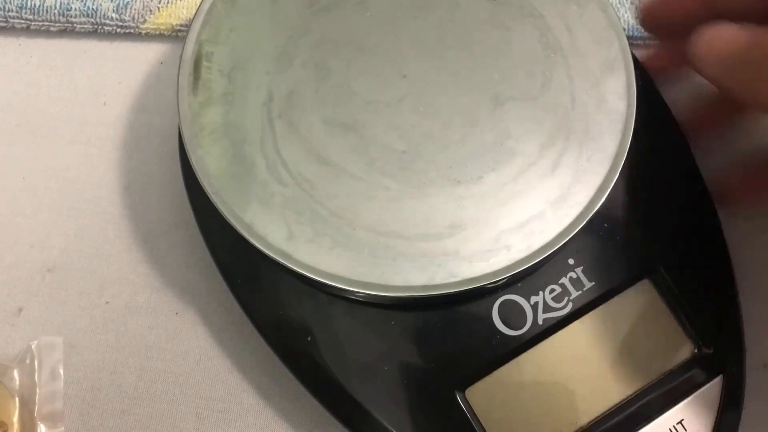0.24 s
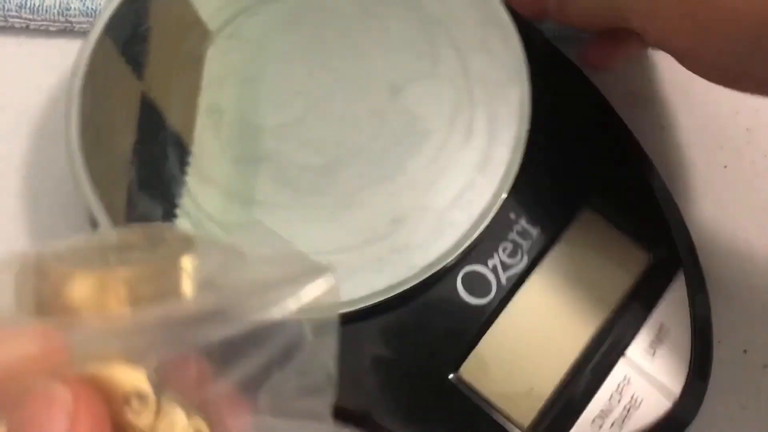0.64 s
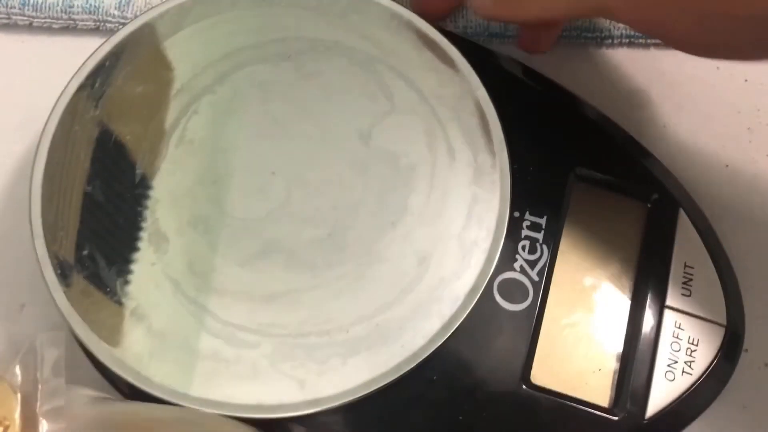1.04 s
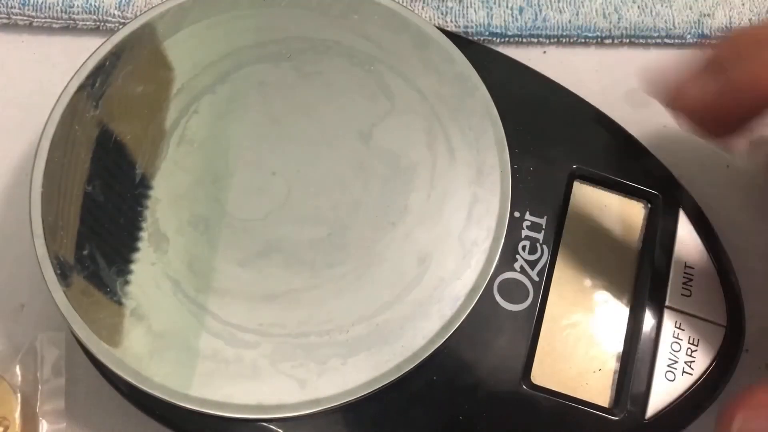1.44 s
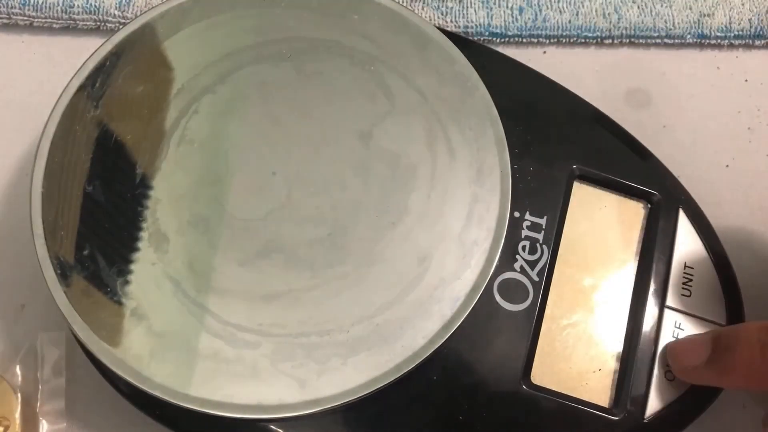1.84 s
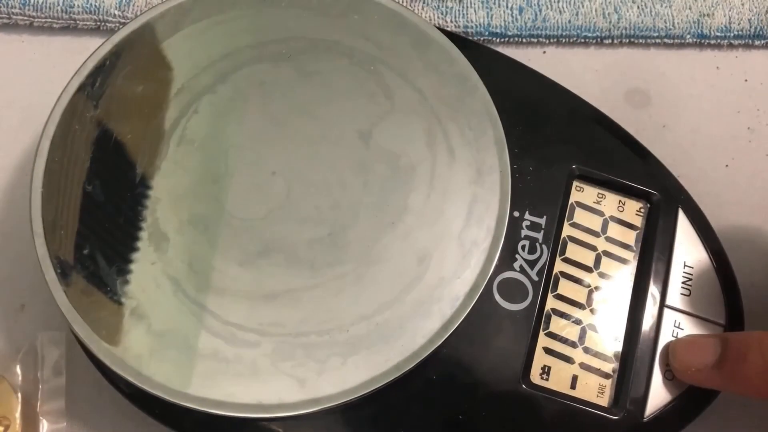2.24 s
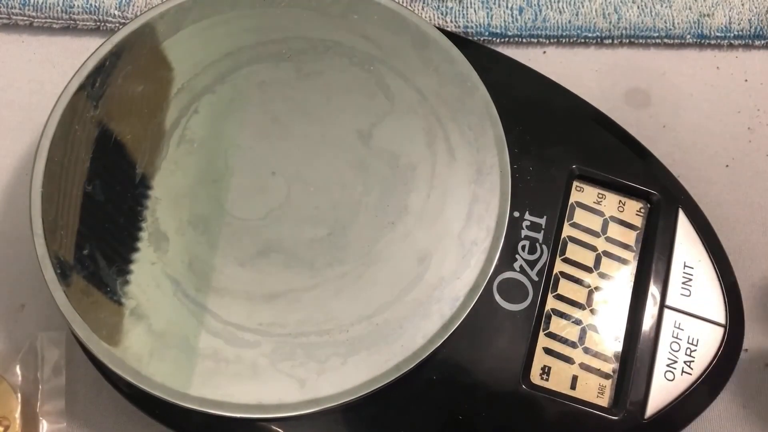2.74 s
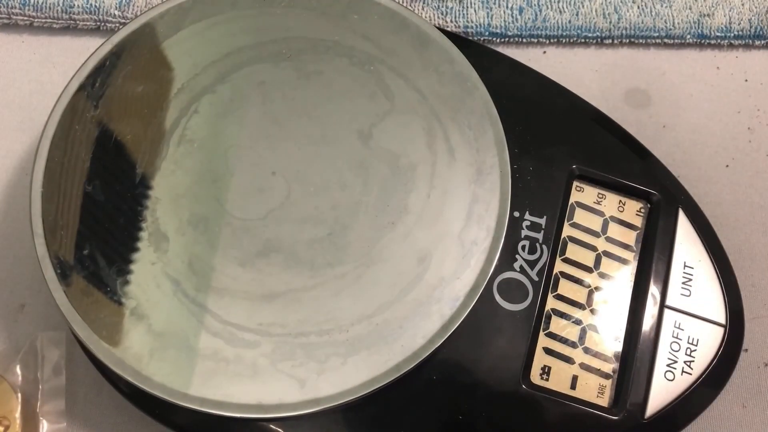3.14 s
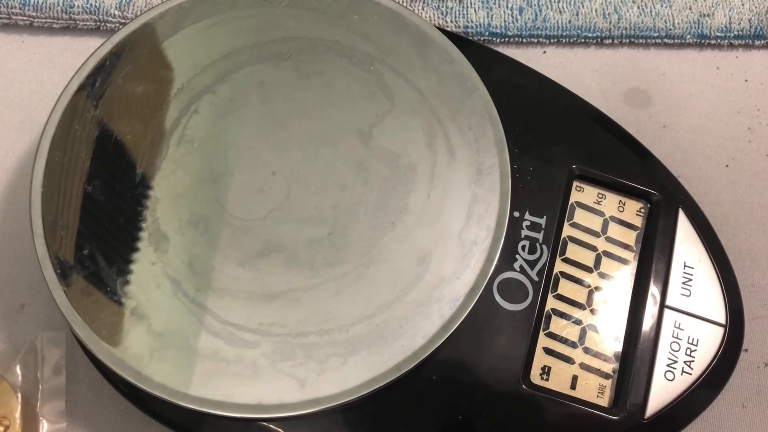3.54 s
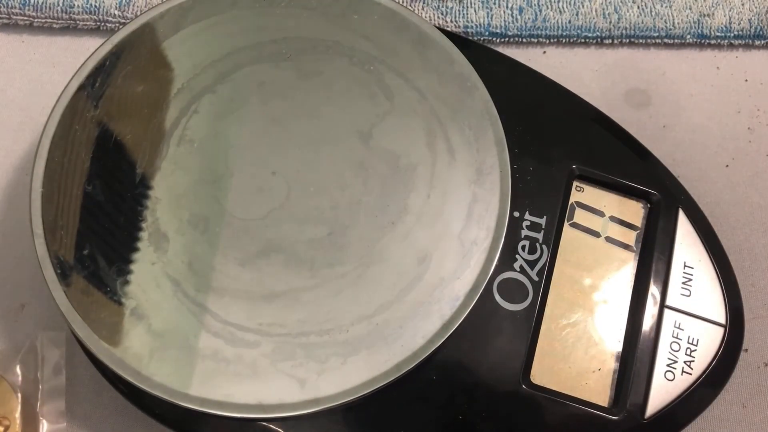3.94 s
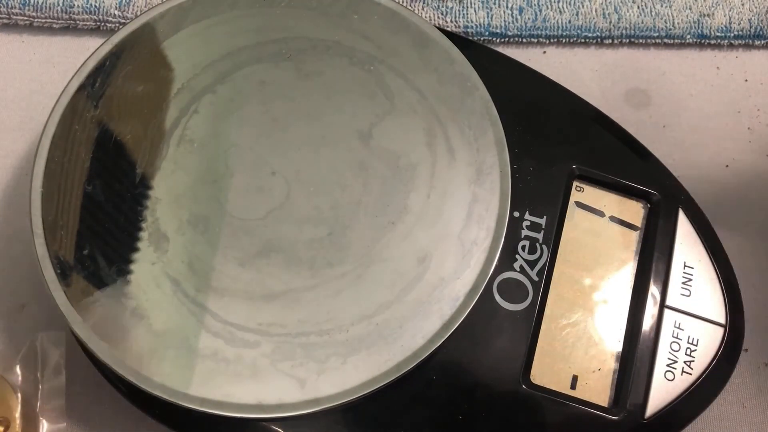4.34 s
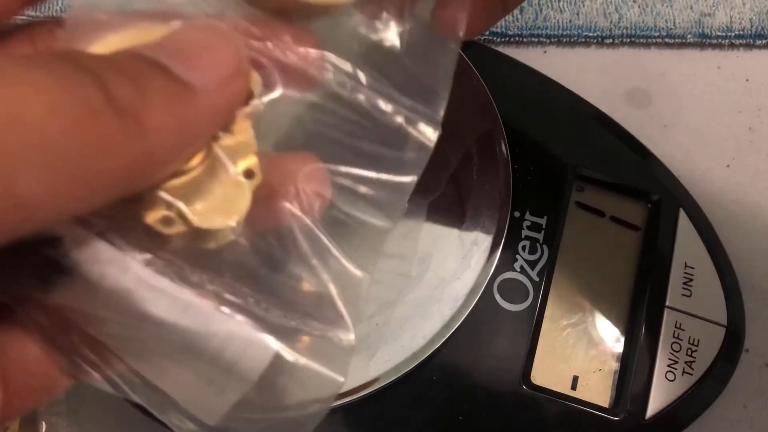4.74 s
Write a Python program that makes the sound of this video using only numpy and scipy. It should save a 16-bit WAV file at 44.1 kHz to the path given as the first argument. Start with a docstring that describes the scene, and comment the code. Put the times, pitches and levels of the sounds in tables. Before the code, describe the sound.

A steady low hum near 120 Hz, with a slightly wavering drone and soft dull room noise, runs throughout. From 0 to 0.8 s plastic bags rustle close by: a strong rub at the start, a sharp crease snap at 0.07, more crackles until 0.7, and soft low bumps at about 0.2, 0.3 and 0.8 as a scale shifts on its feet. From 0.9 to 1.8 s it is nearly quiet, with faint taps and light skin brushes. At 1.84 s the scale's button snaps down, bright, hard and plasticky with a small thud; at 1.99 it releases, duller and slightly softer. A short room tail follows. Between 2.1 and 4.2 s come sparse, quiet finger taps and thin hisses, a duller knock at 3.14, and a crisp bright tick at 3.98. From 4.5 s to the end at 5 s, bags holding metal parts are lifted with dense crinkling, snaps and dull touches.

```python
"""Kitchen scale, button and bagged parts

A scale is turned on a bench, its button clicks down and up, and brass parts in plastic bags are picked up.
Shaped noise and random slips make the rustle and the slides of skin; dispersed pulses make snaps and taps.
The button is a contact pulse ringing case modes, with a thud; decaying low sines are the feet bumping.
A steady tone, a wavering drone and soft noise hum throughout; decaying noise is the small room's tail."""
import sys
import numpy as np
from scipy import signal
from scipy.fft import rfft, irfft
from scipy.io import wavfile
from scipy.ndimage import uniform_filter1d

SR = 44100
rng = np.random.default_rng(int(sys.argv[2]) if len(sys.argv) > 2 else 0)


def unload_audio(sound):
    """Save the sound as a 16-bit wav file, at the path given as the first command line argument."""
    columns = np.transpose(np.atleast_2d(sound))
    # keep every value between -1 and 1, then stretch to whole-number steps
    steps = np.round(np.clip(columns, -1, 1) * 32767)
    wavfile.write(sys.argv[1], SR, steps.astype(np.int16))


N = 220573
TIME, BINS = np.arange(N) / SR, np.fft.rfftfreq(N, 1 / SR)
HIT_TIME = np.arange(4096) / SR
HIT_BINS = np.fft.rfftfreq(len(HIT_TIME), 1 / SR) + 1  # 1 Hz up, so that no bin is zero


def amp(db):
    """Decibels to gain."""
    return 10 ** (np.asarray(db) / 20)


def unit(x):
    """Scales to rms 1."""
    return x / np.sqrt(np.mean(x ** 2) + 1e-20)


def read(points, hz):
    """Reads a table on a log-frequency axis."""
    f, value = np.transpose(points)
    return np.interp(np.log(hz + 1), np.log(f + 1), value)


def add(mix, start_s, sound):
    """Mixes a sound in at start_s."""
    part = mix[max(round(start_s * SR), 0):][:len(sound)]
    part += sound[:len(part)]


def colour(x, gain):
    """Filters a full-length signal by a gain per bin, to rms 1."""
    return unit(irfft(rfft(x) * gain, N))


def drift(rate_hz):
    """Random drift of rms 1, low-passed near rate_hz."""
    return colour(rng.standard_normal(N), np.exp(-(BINS / rate_hz) ** 2))


def pulse(gain):
    """The sharpest causal (minimum-phase) pulse with this spectrum, by folding the cepstrum."""
    cepstrum = irfft(np.log(np.maximum(gain, 1e-5)))
    half = len(cepstrum) // 2
    cepstrum[1:half] *= 2
    cepstrum[half + 1:] = 0
    return irfft(np.exp(rfft(cepstrum)))


def scatter(t60_s, slope):
    """Crowded modes as octave bands of decaying noise, the high ones dying sooner; equal energy per Hz."""
    out, octave = 0, np.log2(HIT_BINS / 125)
    for k in range(8):
        band = np.cos(np.pi / 2 * np.clip(octave - k, -1, 1))
        band_t60_s = t60_s * 2 ** (-slope * (k - 3))  # t60_s holds at 1 kHz
        noise = irfft(rfft(rng.standard_normal(len(HIT_TIME))) * band)
        ring = noise * np.exp(-np.log(1000) * HIT_TIME / band_t60_s)
        out = out + ring / np.linalg.norm(ring) * np.sqrt(np.mean(band ** 2))
    return out


def hum():
    """Steady mains hum and a wavering drone (narrow-band noise) over soft room noise."""
    # room noise spectrum: (frequency [Hz], relative level [dB per Hz])
    floor_colour = [(15, -59), (25, -21), (87, -16), (102, -7.5), (123, -7), (157, -7), (190, -10.5),
                    (293, -19), (326, -23.5), (427, -25.5), (476, -27), (516, -26), (1040, -37.5),
                    (4030, -48), (16000, -55)]
    # drone: (frequency [Hz], level [dB], width [Hz])
    drone = [(136.7, -53.5, 13), (189, -57, 23)]
    floor_db, mains_hz, mains_db = -52.5, 119.1, -52
    out = amp(floor_db) * colour(rng.standard_normal(N), amp(read(floor_colour, BINS)))
    out += amp(mains_db) * unit(np.sin(2 * np.pi * mains_hz * TIME))
    for hz, db, width_hz in drone:
        resonance = 1 / (1 + (2 * (BINS - hz) / width_hz) ** 2)
        out += amp(db) * colour(rng.standard_normal(N), resonance)
    return out


def shifting(x, patchy_db):
    """The film flexes, so its resonances come and go in patches of time and frequency."""
    z = signal.stft(x, SR, nperseg=256)[2]
    patches = uniform_filter1d(rng.standard_normal(z.shape), size=4, axis=0)
    patches = unit(uniform_filter1d(patches, size=6, axis=1))
    return signal.istft(z * amp(patchy_db * patches), SR, nperseg=256)[1][:N]


def stroke_level(start_s, length_s, release_s):
    """One stroke of rubbing: a quick grip, a slow swell as it presses harder, a short release."""
    grip_s, swell_db_per_s = 0.0041, 13.5
    t = np.maximum(TIME - start_s, 0)
    held = np.minimum(t / grip_s, 1) * amp(swell_db_per_s * np.minimum(t, length_s))
    return held * np.exp(-np.clip((t - length_s) / release_s, 0, 20))


def rubbing():
    """Tiny slips of plastic merge into a rustle, duller or brighter from stroke to stroke."""
    # strokes, scale turned and bags lifted: (start [s], length [s], relative body level [dB], fizz above body [dB])
    rubs = [(0.0, 0.11, -49.5, -1), (0.052, 0.015, -55, 11), (0.12, 0.12, -63.5, 2.5),
            (0.176, 0.54, -58.5, -1), (0.736, 0.068, -55.5, -8.5), (0.982, 0.038, -71, 6),
            (1.096, 0.17, -71.5, 3.5), (4.506, 0.049, -56, 5), (4.599, 0.028, -52, 3.5),
            (4.633, 0.06, -55.5, 2), (4.698, 0.057, -50.5, 0.5), (4.756, 0.07, -57, 4),
            (4.85, 0.15, -68, -1), (4.965, 0.037, -61, 4)]
    # rustle spectrum: (frequency [Hz], relative level [dB per Hz])
    rub_colour = [(120, -2), (250, 7), (500, 0), (1200, 1.5), (2200, -4), (4000, -2.5), (5500, -6),
                  (7200, -8), (9000, -11), (12000, -12), (16000, -15.5)]
    slips_per_s, slip_db, smooth = 1500, 2.0, 0.53  # smooth: share of plain noise
    split_hz, trim_db = 2700, -1
    body_release_s, fizz_release_s = 0.021, 0.012  # the fizz stops sooner than the body
    slip_size = amp(slip_db * np.minimum(rng.exponential(1, N), 4))
    slips = (rng.random(N) < slips_per_s / SR) * rng.choice([-1, 1], N) * slip_size
    drive = shifting(unit(slips) + smooth * rng.standard_normal(N), patchy_db=1.66)
    drive = drive * amp(1.0 * drift(91))  # flutter of 1 dB rms
    shape, low = amp(read(rub_colour, BINS)), 1 / (1 + (BINS / split_hz) ** 4)
    body_power, fizz_power = np.zeros((2, N))
    for start_s, length_s, db, fizz_db in rubs:
        body_power += (amp(db) * stroke_level(start_s, length_s, body_release_s)) ** 2
        fizz_power += (amp(db + fizz_db) * stroke_level(start_s, length_s, fizz_release_s)) ** 2
    body = colour(drive, shape * low) * np.sqrt(body_power)
    fizz = colour(drive, shape * (1 - low)) * np.sqrt(fizz_power)
    return amp(trim_db) * (body + fizz)


def clicks(rows, t60_s, crowd_db, skirt_db, gain_db, bass_hz, lag_s):
    """A sharp push with a broad resonance, then milliseconds of crowded modes: (direct, into the room)."""
    direct, spread = np.zeros(N), np.zeros(N)
    # bending waves in a thin sheet carry the treble first; lag_s is the delay at 1 kHz
    bending = np.exp(-4j * np.pi * lag_s * np.sqrt(1000 * HIT_BINS))
    for start_s, db, hz, width_oct, treble_hz in rows:
        offset = np.log2(HIT_BINS / hz) / max(width_oct, .2)  # in resonance widths
        resonance = amp(-skirt_db * (np.sqrt(1 + offset ** 2) + 3.0))
        edges = (1 + (bass_hz / HIT_BINS) ** 2) * np.sqrt(1 + (HIT_BINS / treble_hz) ** 6)
        push = irfft(rfft(pulse(resonance / edges)) * bending)
        modes = signal.fftconvolve(push, scatter(t60_s, 0.43))[:len(push)]
        click = push + amp(crowd_db) * modes
        size = amp(db + gain_db) * np.sqrt(.005 * SR)  # table levels are rms over 5 ms
        add(direct, start_s - lag_s / 2, size * click / np.linalg.norm(click))
        add(spread, start_s, size * push / np.linalg.norm(push))
    return np.array([direct, spread])


def creases():
    """Creases snap in the plastic, each a dispersed push of fixed width: (direct, into the room)."""
    # (time [s], relative level over 5 ms [dB], centre [Hz], treble corner [Hz])
    snap_table = [(0.065, -23, 1910, 18000), (0.2277, -33, 750, 18100), (0.3196, -26, 5500, 7800),
                  (0.38, -41.5, 7000, 12000), (0.4863, -44.5, 1600, 4170), (0.628, -37, 9900, 2560),
                  (0.7147, -29.5, 635, 5100), (4.515, -36, 895, 9800), (4.521, -37, 1600, 8900),
                  (4.5528, -30.5, 3300, 5250), (4.6586, -28.5, 2600, 3620), (4.7087, -28, 3800, 4500),
                  (4.7167, -42, 4000, 5200), (4.7378, -26, 1970, 16000), (4.7687, -33, 1310, 7600),
                  (4.789, -30.5, 1290, 6450), (4.796, -43, 2200, 5500), (4.8212, -30.5, 3200, 3420),
                  (4.8304, -31.5, 1610, 4500), (4.9157, -33.5, 1900, 3500), (4.9644, -51.5, 6630, 11000)]
    width_oct = 2.12
    rows = [(start_s, db, hz, width_oct, treble_hz) for start_s, db, hz, treble_hz in snap_table]
    return clicks(rows, t60_s=0.018, crowd_db=5.5, skirt_db=15, gain_db=-1.5, bass_hz=290, lag_s=0.001287)


def finger_taps():
    """Fingers and parts touch scale and bench, each a push of its own width: (direct, into the room)."""
    # (time [s], relative level over 5 ms [dB], centre [Hz], width [octaves])
    tap_table = [(0.1877, -46.5, 950, 0.5), (0.2421, -39, 990, 1.04), (0.7561, -47.5, 1300, 1.35),
                 (0.9063, -57.5, 2980, 0.99), (1.0279, -52, 2970, 1.6), (1.3224, -59, 500, 2.6),
                 (1.6212, -51, 860, 0.56), (1.6927, -54, 700, 2), (1.8208, -57.5, 2000, 1.1),
                 (2.149, -40.5, 1100, 0.63), (2.3154, -52.5, 1053, 0.8), (2.3235, -52.5, 1440, 1.5),
                 (2.3703, -65, 7000, 1.8), (2.742, -54, 620, 1.07), (2.7943, -52, 540, 1.23),
                 (2.8813, -44, 650, 3.1), (2.9243, -45.5, 526, 1.14), (3.0282, -52.5, 900, 1.36),
                 (3.1406, -40.5, 470, 2), (3.8709, -48.5, 620, 1.45), (3.9561, -47.5, 610, 0.7),
                 (3.9791, -28.5, 3800, 1.26), (4.0237, -50.5, 500, 0.84), (4.0897, -47.5, 503, 0.83),
                 (4.1341, -49.5, 749, 1.36), (4.5738, -40, 700, 1.14), (4.5925, -38.5, 444, 0.97),
                 (4.635, -40.5, 456, 1.4)]
    treble_hz = 15940
    rows = [(start_s, db, hz, width_oct, treble_hz) for start_s, db, hz, width_oct in tap_table]
    return clicks(rows, t60_s=0.023, crowd_db=3.5, skirt_db=16.0, gain_db=0.5, bass_hz=310, lag_s=0.0013)


def bumps():
    """The scale rocks briefly on its soft rubber feet: low sines, softly started and decaying."""
    # (time [s], relative level [dB], frequency [Hz], t60 [s])
    bump_table = [(0.189, -31.5, 73, 0.1), (.325, -41, 60, 0.12), (0.834, -35.5, 69.4, 0.089)]
    gain_db, rise_s = 9, 0.014
    out, t = np.zeros(N), TIME[:SR // 2]
    for start_s, db, hz, t60_s in bump_table:
        level = amp(db + gain_db - 60 * t / t60_s) * (1 - np.exp(-t / rise_s))
        add(out, start_s, level * np.sin(2 * np.pi * hz * t))
    return out


def slides():
    """Skin hisses over case and bags: short strokes of band-passed noise."""
    # (start [s], length [s], level [dB], centre [Hz], width [Hz])
    slide_table = [(0.5, 0.22, -57, 5300, 1600), (1.021, 0.023, -61.5, 3180, 9000),
                   (1.084, 0.031, -63.5, 4840, 700), (1.146, 0.15, -73, 4600, 900),
                   (1.222, 0.047, -64, 6950, 1800), (1.235, 0.029, -58.5, 3000, 1200),
                   (2.314, 0.02, -55.5, 2500, 8120), (2.541, 0.42, -70.5, 4970, 14000),
                   (2.701, 0.23, -73, 6590, 1200), (2.849, 0.096, -59, 2570, 5000),
                   (3.017, 0.0208, -57, 3020, 12000), (3.834, 0.04, -63.5, 2984, 10000),
                   (4.228, 0.056, -68, 3800, 1710), (4.506, 0.037, -55.5, 11000, 12100)]
    out = np.zeros(N)
    for start_s, length_s, db, hz, width_hz in slide_table:
        hiss = colour(rng.standard_normal(N), 1 / (1 + (2 * (BINS - hz) / width_hz) ** 2))
        stroke = signal.windows.tukey(int(length_s * SR), .5)
        add(out, start_s, amp(db) * hiss[:len(stroke)] * stroke)
    return out


def button():
    """The dome switch snaps, rings the case and thuds the scale on the bench: (direct, into the room)."""
    # down, then up: (time [s], level [dB], treble corner [Hz], bass corner [Hz], ring rise [s], thud level [dB])
    presses = [(1.8429, 18, 4832, 995, 0.0004, -11), (1.9902, 14.5, 1960, 283, 0.00055, -8)]
    # plastic case modes: (frequency [Hz], relative level [dB], t60 [s])
    case_modes = [(279, -10, 0.056), (420, -18, 0.059), (569.3, -14.5, 0.035), (730, -14.5, 0.057),
                  (820, -15, 0.026), (984, -8, 0.037), (1196, -8.5, 0.035), (1764, 0.5, 0.014),
                  (2030, -6.5, .02), (2460, -7.5, .015), (2844, -9, 0.021), (3090, -3.5, 0.014),
                  (3570, -6, 0.021), (4430, -0.5, 0.012), (5050, -3.5, .012), (6100, -1.5, 0.0097),
                  (6790, -10, 0.018), (8000, -11.5, 0.0053), (8300, -13.5, .009), (12200, -12, 0.011)]
    # what the case radiates all round, into the room: (frequency [Hz], relative level [dB])
    heard_wide = [(100, -5.5), (330, 9.5), (780, -4), (1150, 4.5), (1850, 4), (2550, -2), (2950, 6),
                  (3300, 3.5), (3850, -4), (4800, -5.5), (6600, -2), (7400, -8), (11200, -6.5),
                  (15000, -15.5)]
    ring_db, crowd_db, spread_db, air_hz = -23, -7, 3.0, 11000
    thud_hz, thud_t60_s, thud_rise_s, thud_lag_s = 145, 0.03, 0.0058, 0.01
    direct, spread, t = np.zeros(N), np.zeros(N), HIT_TIME
    for start_s, db, treble_hz, bass_hz, rise_s, thud_db in presses:
        modes = 0
        for k, (hz, mode_db, t60_s) in enumerate(case_modes):
            modes = modes + (-1) ** k * amp(mode_db - 60 * t / t60_s) * np.sin(2 * np.pi * hz * t)
        ring = amp(ring_db) * modes + amp(crowd_db) * scatter(0.039, .18)
        ring = ring * (1 - np.exp(-t / rise_s))
        softness = (1 + (HIT_BINS / treble_hz) ** 2) * (1 + (HIT_BINS / air_hz) ** 2)
        contact = 1 / np.sqrt(softness * (1 + (bass_hz / HIT_BINS) ** 2))
        add(direct, start_s, amp(db) * signal.fftconvolve(ring, pulse(contact)))
        add(spread, start_s, amp(db + spread_db) * pulse(contact * amp(read(heard_wide, HIT_BINS))))
        thud_level = amp(thud_db - 60 * t / thud_t60_s) * (1 - np.exp(-(t / thud_rise_s) ** 2))
        add(direct, start_s + thud_lag_s, thud_level * np.sin(2 * np.pi * thud_hz * t))
    return np.array([direct, spread])


def room(x):
    """The diffuse tail of a small room: noise, each band dying at its own speed."""
    # decay: (frequency [Hz], t60 [s])
    room_t60 = [(150, .4), (500, 0.42), (1400, 0.41), (3700, 0.52), (10000, 0.26)]
    # tail spectrum: (frequency [Hz], relative level [dB])
    room_colour = [(60, -11), (150, 5), (500, 4), (1500, -1.5), (3200, -5.5), (7000, -3.5), (15000, -5)]
    wet_db, build_s = -18, 0.0023
    hz, t, z = signal.stft(rng.standard_normal(SR), SR, nperseg=256)
    tail_db = read(room_colour, hz)[:, None] - 60 * t / read(room_t60, hz)[:, None]
    tail = signal.istft(z * amp(tail_db), SR, nperseg=256)[1][:SR]
    tail *= 1 - np.exp(-(TIME[:SR] / build_s) ** 2)
    return amp(wet_db) * signal.fftconvolve(x, tail / np.linalg.norm(tail))[:N]


def scene():
    """Scale and bench lie farther from the microphone than the bags, so they sound more of the room."""
    switch, switch_wide = button()
    taps, taps_wide = finger_taps()
    snaps, snaps_wide = creases()
    rustle = rubbing() + slides()
    echo = room(switch_wide + amp(4) * taps_wide + amp(-0.5) * (snaps_wide + rustle))
    return (switch + taps + snaps + rustle + bumps() + echo + hum())[None]


def record(dry):
    """The microphone sheds the deepest bass; then the band limit."""
    bass_hz, edge_hz = 46, 15800
    thin = signal.sosfilt(signal.butter(3, bass_hz, "highpass", fs=SR, output="sos"), dry)
    band_limit = signal.firwin(255, edge_hz, window=("kaiser", 9), fs=SR)
    return signal.oaconvolve(thin, band_limit[None], "same")


dry = scene()
out = record(dry)
unload_audio(out)
```